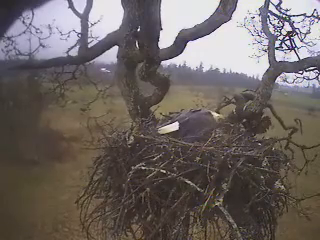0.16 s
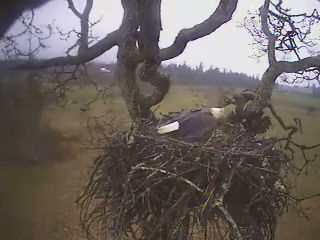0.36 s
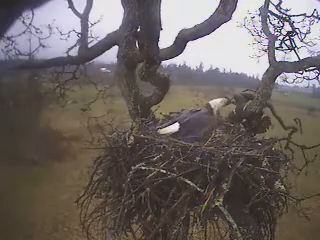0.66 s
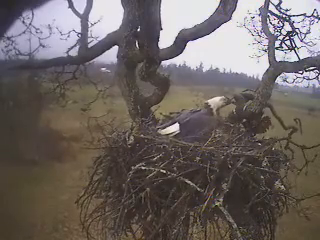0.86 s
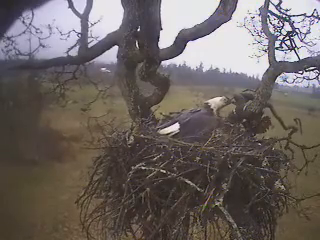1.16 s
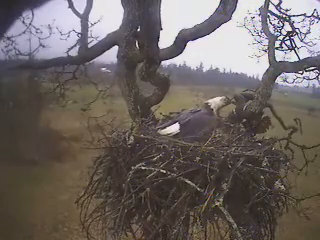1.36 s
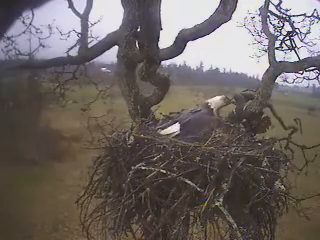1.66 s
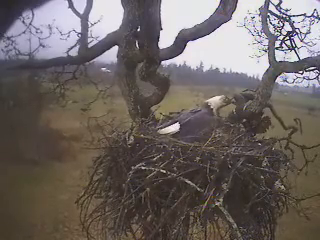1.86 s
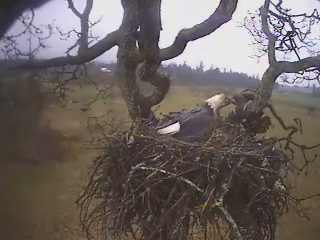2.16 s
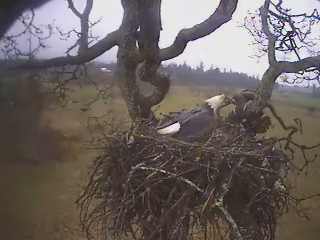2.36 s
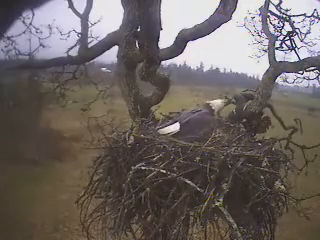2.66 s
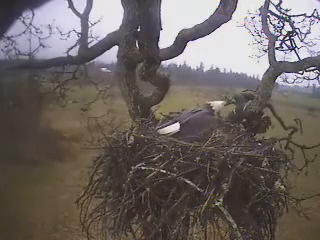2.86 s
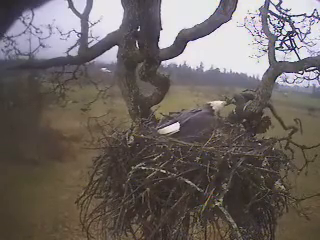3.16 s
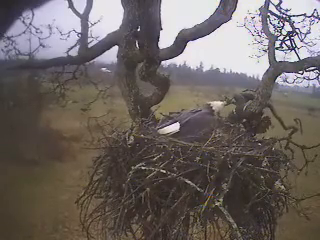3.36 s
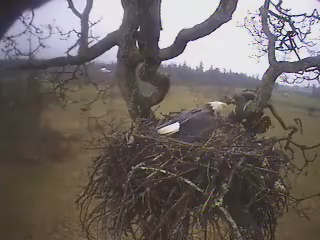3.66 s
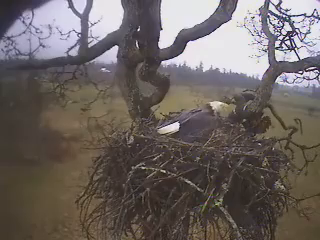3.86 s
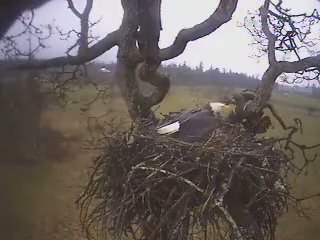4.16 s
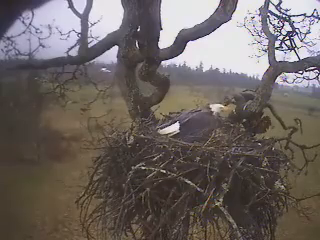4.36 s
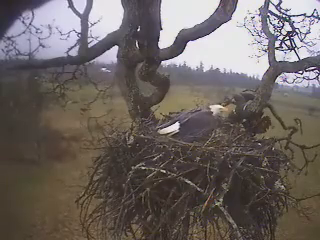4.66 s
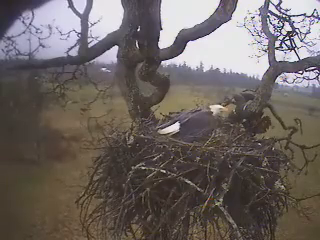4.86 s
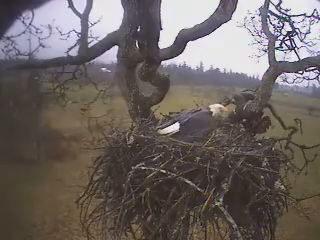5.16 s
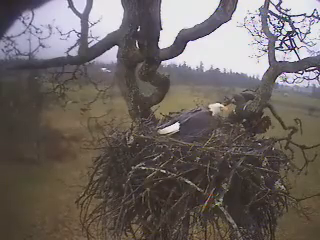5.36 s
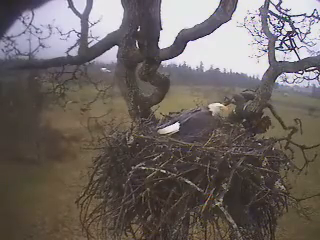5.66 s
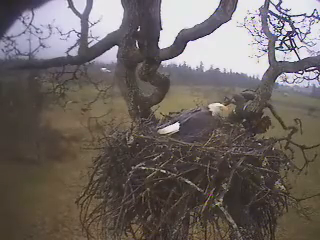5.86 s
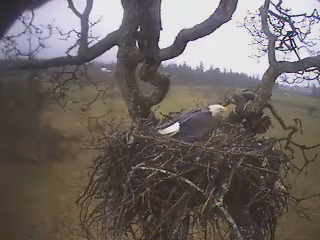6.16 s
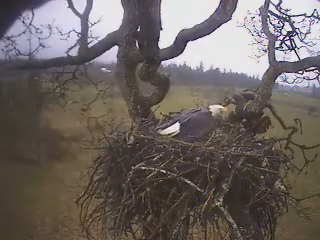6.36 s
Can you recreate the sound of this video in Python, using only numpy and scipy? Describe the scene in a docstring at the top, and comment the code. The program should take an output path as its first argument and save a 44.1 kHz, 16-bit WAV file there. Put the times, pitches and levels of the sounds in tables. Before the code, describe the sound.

A bald eagle squeals hoarsely, gives eight short rising yelps, then overloaded bursts of shrill chittering over low wind and steady hiss in a treetop nest.

```python
"""A hoarse squeal opens the scene at a treetop nest of two bald eagles, over low wind and steady hiss.
Eight short rising yelps and bursts of shrill chittering follow, with thin piping from farther away.
Each call is a near-pure tone with an octave and hoarse noise; sparse random taps give its faint echoes.
The calls overload a small nest microphone; twig ticks, rustles and puffs are brief shaped noise.
Nearly all of the sound is in the left channel."""
import sys
import numpy as np
from scipy import signal
from scipy.fft import rfft, irfft, next_fast_len
from scipy.io import wavfile
from scipy.ndimage import uniform_filter1d

SR = 44100
rng = np.random.default_rng(int(sys.argv[2]) if len(sys.argv) > 2 else 0)


def write(x):
    x = np.atleast_2d(x).T
    wavfile.write(sys.argv[1], SR, np.round(np.clip(x, -1, 1) * 32767).astype(np.int16))


N = 287077
T = np.arange(N) / SR  # [s]

# In all tables levels are relative; octave levels are relative to the fundamental.
# wind spectrum: (frequency [Hz], density [dB per Hz])
WIND = [(15, -57), (30, 5.5), (48, -2.5), (72, -0.5), (87, 1), (104, -5.5), (150, -9.5), (178, -7.5),
        (230, -14.5), (400, -19.5), (750, -22.5), (1100, -20.5), (1550, -29), (2000, -62)]
# hiss spectrum: (frequency [Hz], density [dB per Hz])
HISS = [(1200, -27), (1700, 7.5), (1930, -13), (2200, 11), (2420, 0), (2600, -7), (2870, 7), (3150, -2.5),
        (4300, 5.5), (5400, 6), (7150, -1), (7700, -20), (8400, -13), (9200, -57)]
# twig ticks: (start [s], snap level [dB], knock level [dB])
TICKS = [(0.7555, -31, -41), (0.8042, -32, -52), (2.5274, -50, -35.5), (3.02, -38, -38),
         (3.1002, -38.5, -44), (3.429, -37, -42), (3.5727, -31.5, -58), (3.8616, -38, -59),
         (4.013, -32.5, -34.5), (4.28, -34, -38), (5.6155, -38, -41.5), (5.676, -41, -59),
         (5.8429, -29, -39), (6.0018, -36.5, -60)]
# dry snap and rustle spectrum: (frequency [Hz], gain [dB])
SNAP_COLOUR = [(800, -13), (2200, -2), (4000, 4.5), (5500, 5), (7000, -2), (8500, -45), (10000, -34),
               (12000, -38)]
# dull knock spectrum: (frequency [Hz], gain [dB])
KNOCK_COLOUR = [(200, -20), (600, 5), (1100, 1), (1800, 0.5), (3500, -56)]
# short dry rustles in the nest: (centre [s], level [dB], half length [s])
RUSTLES = [(.638, -20.5, 0.0032), (.655, -32, 0.079), (1.502, -28, 0.012)]
# soft low puffs from the bird after its yelps: (centre [s], level [dB], half length [s])
PUFFS = [(0.696, -27, 0.03), (1.013, -25.5, 0.031), (1.263, -26.5, 0.027), (1.55, -27.5, 0.034),
         (1.833, -25.5, 0.017), (2.122, -35.5, 0.022), (2.378, -35.5, 0.02), (2.658, -29, 0.026)]
# puff spectrum: (frequency [Hz], gain [dB])
PUFF_COLOUR = [(150, -17), (400, 10.5), (560, -10), (760, 14.5), (1000, 4), (1400, 8), (1750, 9),
               (2300, -44), (6000, -69)]
# reverberation of the trees: (frequency [Hz], 60 dB decay time [s])
TREES = [(500, 0.96), (2500, 0.77), (5500, 0.84), (8000, 0.49), (12000, 0.74)]
# spectrum of the breathy hiss around the calls: (frequency [Hz], density [dB per Hz])
CALL_HISS = [(500, -10), (1500, -4), (1900, -4.5), (2250, 3), (2900, 7), (3800, -11), (4500, 5),
             (5600, 3.5), (6700, -10.5), (8400, -4), (9300, -26), (12000, -12.5)]
# thin distant notes:
# (start [s], length [s], first pitch [Hz], middle pitch [Hz], last pitch [Hz], level [dB], octave level [dB])
PIPES = [ (.885, 0.23, 3594, 3690, 3820, -18, -11), (1.562, 0.1, 4905, 5210, 5400, -28.5, -40),
         (1.655, 0.093, 4050, 3985, 3935, -16.5, -17.5), (2.287, .034, 3500, 3430, 3535, -14, -12),
         (4.303, 0.015, 3620, 3623, 3450, -15, 0), (4.97, 0.03, 1370, 1391, 1404, -24, -12),
         (6.233, 0.021, 4060, 3870, 3940, -14, -10), ]
# registers of the opening squeal:
# (start [s], length [s], first pitch [Hz], middle pitch [Hz], last pitch [Hz], effort [dB], octave level [dB])
SQUEAL = [(0, .082, 2262, 2277, 2400, -2.5, 10.5), (.079, 0.1, 3182, 3255, 3247, -8.5, -43),
          (.18, 0.034, 2350, 1945, 1880, -14.5, 2.5)]
# two-voiced part of the squeal: (time [s], signed relative strength)
SPLIT = [(.078, -1.5), (.086, 3.6), (.12, 2.1), (.16, 3.5), (.178, 3.5), (.184, -1)]
# tones added by the second voice: (multiple of the pitch, level [dB])
SPLIT_TONES = [(4 / 5, -14.5), (6 / 5, -17.5), (8 / 5, -17), (9 / 5, -8.5), (10 / 5, -20.5)]
# yelps that crack from a low into a high register: (start [s], length [s], crack after the start [s],
# top pitch [Hz], low-register effort [dB], high-register effort [dB], octave level [dB])
YELPS = [ (.511, 0.045, 0.032, 3186, -4.5, -6, -10), (.898, 0.062, 0.03, 3047, -6, -2, -10.5),
         (1.154, .079, .024, 2772, -9, -12, 1.5), (1.441, 0.056, 0.028, 2850, -4.5, -9, -0.5),
         (1.72, 0.056, 0.025, 2788, -8, -8.5, -1.5), (2.014, 0.072, 0.027, 2876, -6, -7, -3),
         (2.277, 0.069, 0.019, 2824, -10.5, -7.5, -9), (2.545, 0.068, 0.026, 2937, -8, -5, -4), ]
# upward sweep that opens every yelp: (from [Hz], to [Hz], rise time [s])
LOW_REGISTER = (1500, 2510, .018)
# throat resonances in a yelp: (frequency [Hz], gain [dB])
THROAT = [(1300, -18), (1620, 1), (1900, -23.5), (2230, 3.5), (2520, 2), (2820, 2), (3500, -19),
          (4150, 2.5), (4550, -9.5), (4920, 9), (5230, 5), (5580, 1), (6500, -4), (8400, 5.5)]
# shrill arched notes, slurred into a wavering scream where they touch:
# (start [s], length [s], first pitch [Hz], crest pitch [Hz], last pitch [Hz], effort [dB], octave level [dB])
CHITTER = [ (4.302, 0.022, 2850, 2880, 2832, -11, -20), (4.355, .094, 2836, 3012, 2795, 11, -3.5),
           (4.448, 0.087, 2795, 3009, 2812, 13, -1), (4.557, .076, 2815, 2927, 2820, 12.5, -7),
           (4.659, .016, 4287, 4850, 4465, -9, -26), (4.678, 0.015, 2952, 2872, 2793, 11.5, -5),
           (4.692, 0.034, 2816, 2935, 2787, 15.5, -9), (4.731, .014, 2278, 2212, 2139, -12.5, -8),
           (4.785, 0.0098, 3950, 3810, 3390, -19, -2), (4.794, .012, 2925, 2835, 2810, 13, -3),
           (4.805, 0.032, 2306, 2414, 2305, 1, 13.5), (4.832, .021, 2270, 2230, 2034, 7.5, 0),
           (4.876, .064, 1969, 2302, 2103, 2.5, 5.5), (6.241, 0.0486, 2898, 2870, 2810, 7, -58),
           (6.285, 0.085, 2903, 2958, 2750, 13.5, -9.5), (6.376, 0.11, 2710, 2930, 2860, 11.5, -21.5),
           (6.481, 0.051, 2866, 2864, 2875, 25, -5.5), ]
# register flips: (pitch [Hz], width [Hz], fundamental loss [dB], octave gain [dB])
YELP_FLIP = (2392, 122, 7.8, 9.7)
CHITTER_FLIP = (2735, 52, 7.1, 30.4)
# windpipe: (one resonance [Hz], spacing to its neighbours [Hz])
WINDPIPE = (2230, 600)
# sputter of the overloaded input: (frequency [Hz], density [dB per Hz])
SPUTTER = [(30, -13), (120, -3.5), (420, 8), (900, -7.5), (2300, -0.5), (4000, -41), (12000, -24)]
# microphone response to the calls: (frequency [Hz], gain [dB])
MICROPHONE = [(2000, -1.5), (6000, -3.5), (8800, -2.5), (9800, -7), (11500, -15.5), (12500, -6.5)]
# leak of the calls into the right channel: (frequency [Hz], gain [dB])
LEAK = [(2500, -24.5), (4500, -23.5), (8500, -26), (12000, -40)]

YELP_ATTACK_S, YELP_RELEASE_S, YELP_EDGE_DB = 0.021, 0.012, -19.5
CRACK_S, CRACK_DB = 0.0028, -11  # the voice falters briefly as it cracks
HIGH_ARCH_HZ, HIGH_CREST = 199.4, 0.58  # climb after the crack; crest as a share of the time left
RASP_FADE_S = 0.0041  # decay time of the power of the rasp after a pitch break
EDGE_HZ = 12550  # upper band limit


def amp(db):
    """Logarithmic level: decibels become an amplitude ratio."""
    return 10 ** (np.asarray(db) / 20)


def unit(x):
    """Normalisation: scales to an rms of 1."""
    return x / np.sqrt(np.mean(x ** 2) + 1e-20)


def read(points, hz):
    """Linear interpolation of a table on a log-frequency axis."""
    f, value = np.transpose(points)
    return np.interp(np.log(hz + 1), np.log(f + 1), value)


def shape(x, colour):
    """Linear filtering: multiplies the spectrum by a gain table."""
    size = next_fast_len(N + 4096)
    gain = amp(read(colour, np.fft.rfftfreq(size, 1 / SR)))
    return irfft(rfft(x, size) * gain, size)[:N]


def noise(colour):
    """Spectral shaping: white noise takes the given colour at an rms of 1."""
    return unit(shape(rng.standard_normal(N), colour))


def wander(hz):
    """Low-passed random process: changes smoothly, up to about hz times a second."""
    size = next_fast_len(N)
    low_pass = 1 / (1 + (np.fft.rfftfreq(size, 1 / SR) / hz) ** 4)
    return unit(irfft(rfft(rng.standard_normal(size)) * low_pass, size)[:N])


def swells(rows):
    """Gaussian envelopes: one short hump of level for each row."""
    return sum(amp(db) * np.exp(-((T - s) / half) ** 2) for s, db, half in rows)


def air(wind_db=-36, hiss_db=-46.5):
    """Stationary broadband noise: low wind under an almost even hiss."""
    gust, flicker = amp(0.5 * wander(6)), amp(0.4 * wander(20))
    return amp(wind_db) * gust * noise(WIND) + amp(hiss_db) * flicker * noise(HISS)


def twigs(snap_db=1, knock_db=5, t60=0.043, rise_s=0.000067):
    """Impulsive excitation with exponential decay: a dry snap with a duller knock under it."""
    snap, knock, out = noise(SNAP_COLOUR), noise(KNOCK_COLOUR), np.zeros(N)
    for start, tick_db, low_db in TICKS:
        at = np.flatnonzero((T >= start) & (T < start + 0.1))
        age = T[at] - start
        envelope = np.tanh(age / rise_s) * amp(-60 * age / t60)
        tick = amp(tick_db + snap_db) * snap[at] + amp(low_db + knock_db) * knock[at]
        out[at] += envelope * tick
    return out


def puffs_and_rustles(ragged_db=2.0):
    """Amplitude-modulated noise: ragged, hollow puffs from the bird and dry rustles in the nest."""
    puffs = noise(PUFF_COLOUR) * swells(PUFFS)
    rustles = noise(SNAP_COLOUR) * swells(RUSTLES)
    return (puffs + rustles) * amp(ragged_db * wander(100))


def surroundings(x, nest_db, nest_t60, trees_db, echo_db, echo_s, echo_width):
    """Multipath convolution: scatter from nest and limbs, a tail from the trees, a soft ground echo."""
    t = T[:SR]
    # three sets of sparse random reflections, about 3000 a second
    taps = rng.choice([-1., 1.], (3, SR)) * (rng.random((3, SR)) < 3000 / SR)
    nest = taps[0] * amp(-60 * t / nest_t60) * (t > 0.003)
    hz, when, spectrum = signal.stft(taps[1] * (t > 0.012), SR, nperseg=256)
    decay = amp(-60 * when / read(TREES, hz)[:, None])
    trees = signal.istft(spectrum * decay, SR, nperseg=256)[1][:SR]
    echo = taps[2] * np.exp(-((t - echo_s) / echo_width) ** 2)
    paths = [(nest_db, nest), (trees_db, trees), (echo_db, echo)]
    response = sum(amp(db) * unit(h) for db, h in paths) / np.sqrt(SR)
    return signal.fftconvolve(x, response)[:N]


def call_hiss(voice, db, spread_s):
    """Envelope following: noise tracks a smoothed level, so a soft, breathy hiss surrounds each call."""
    window = signal.windows.hann(2 * round(spread_s * SR) + 1)
    power = signal.fftconvolve(np.minimum(voice ** 2, 1), window / window.sum(), "same")
    return amp(db) * np.sqrt(abs(power)) * noise(CALL_HISS)


def arches(notes, swell_db, brighten_db, edge_s, ease):
    """Pitch contours: arched pitch, gain and octave level, offset towards the middle of each note."""
    start, length, first, crest, last, db, octave_db = np.transpose(notes)[:, :, None]
    side = np.linspace(-1, 1, 41)[1:-1]  # from start to end, 0 in the middle
    bend = ease * np.sin(np.pi / 2 * side) ** 2 + (1 - ease) * side ** 2
    when = np.maximum.accumulate((start + length * (side + 1) / 2).ravel())
    pitch = crest + bend * (np.where(side < 0, first, last) - crest)
    controls = pitch, db - swell_db * bend, octave_db - brighten_db * bend
    hz, effort_db, octave_db = (np.interp(T, when, c.ravel()) for c in controls)
    sounding = ((T >= start) & (T < start + length)).any(axis=0)
    gate = uniform_filter1d(1. * sounding, size=round(edge_s * SR))
    return hz, amp(effort_db) * gate ** 3, octave_db


def sweeps(seesaw_db=4.5):
    """Register change: a fast sweep, a crack, then an arch where fundamental and octave trade strength."""
    from_hz, to_hz, rise_s = LOW_REGISTER
    hz, gain, octave_db, shake = np.full(N, 1. * from_hz), np.zeros(N), np.zeros(N), wander(85)
    for start, length, crack_s, top_hz, low_db, high_db, overtone_db in YELPS:
        at = np.flatnonzero((T >= start) & (T < start + length))
        age = T[at] - start
        high = age > crack_s
        crack = np.exp(-((age - crack_s) / CRACK_S) ** 2)
        sweep = to_hz + (from_hz - to_hz) * np.exp(-(age / rise_s) ** 2)
        progress = (age - crack_s) / (length - crack_s)
        arch = top_hz - HIGH_ARCH_HZ * (progress / HIGH_CREST - 1) ** 2
        hz[at] = np.where(high, arch, sweep)
        held = np.minimum(1, np.minimum(age / YELP_ATTACK_S, (length - age) / YELP_RELEASE_S))
        trade_db = seesaw_db * high * shake[at]
        effort_db = np.where(high, high_db, low_db) + YELP_EDGE_DB * (1 - held)
        effort_db += CRACK_DB * crack - trade_db
        gain[at] = amp(effort_db) * signal.windows.tukey(len(at), 0.06)
        octave_db[at] = overtone_db + 1.8 * trade_db
    return hz, gain, octave_db


def flipped(voice, flip):
    """Mode switching: near one awkward pitch the fundamental gives way and the octave takes over."""
    hz, gain, octave_db = voice
    centre_hz, width_hz, loss_db, gain_db = flip
    near = np.exp(-((hz - centre_hz) / width_hz) ** 2)
    return hz, gain * amp(-loss_db * near), octave_db + (loss_db + gain_db) * near


def whistles(voice, jitter, shimmer, third_db, hoarse_db, rasp_db, cling=0):
    """Syrinx oscillation: a near-pure tone with a hoarse octave, which rasps where the pitch breaks."""
    at = np.flatnonzero(voice[1] > 1e-4)  # only the sounding samples
    hz, gain, octave_db = (uniform_filter1d(c, size=110) for c in voice)
    out, drift, flutter = np.zeros(N), wander(316)[at], wander(133)[at]
    turbulence = (wander(180) + 1j * wander(365))[at]
    rasp = noise([(200, 10.5), (1500, -9), (4500, 2.5), (7000, 1), (12000, -47)])[at]
    split = np.interp(T[at], *np.transpose(SPLIT), left=0, right=0)
    octave = amp(octave_db[at])
    # the pitch clings to the evenly spaced windpipe resonances, so a glide climbs in steps
    anchor, spacing = WINDPIPE
    hz = hz - cling * spacing / (2 * np.pi) * np.sin(2 * np.pi * (hz - anchor) / spacing)
    phase = 2 * np.pi * np.cumsum(hz[at] * (1 + jitter * drift)) / SR
    tone = np.cos(phase) + octave * (np.cos(2 * phase) - amp(third_db) * np.cos(3 * phase))
    # turbulent air makes each cycle unevenly lopsided, which blurs the octave
    tone += amp(hoarse_db) * (1 + 2 * octave) * (turbulence * np.exp(2j * phase)).real
    # the two sides of the syrinx lock at 4:5 and give sum and difference tones
    tone += split * sum(amp(db) * np.cos(multiple * phase) for multiple, db in SPLIT_TONES)
    # fast pitch change sets off the rasp, which then dies away
    breaking = np.tanh((np.gradient(np.log(hz)) * SR / 30) ** 2)
    keep = np.exp(-1 / (RASP_FADE_S * SR))
    breaking = np.sqrt(signal.lfilter([1 - keep], [1, -keep], breaking ** 2 + 1e-12))[at]
    out[at] = gain[at] * (tone * np.exp(shimmer * flutter) + amp(rasp_db) * breaking * rasp)
    return out


def far_piping():
    """Tonal radiation: thin distant notes with almost no third partial or hoarseness."""
    notes = arches(PIPES, swell_db=11.5, brighten_db=-0.5, edge_s=0.0096, ease=0.82)
    return whistles(notes, jitter=0.02, shimmer=0.22, third_db=-45, hoarse_db=-45, rasp_db=-20)


def opening_squeal():
    """Biphonation: a squeal in three registers that splits into two locked voices."""
    notes = arches(SQUEAL, swell_db=3, brighten_db=9.0, edge_s=0.0049, ease=0.46)
    return whistles(notes, jitter=0.006, shimmer=0.13, third_db=-17, hoarse_db=-22, rasp_db=-12)


def rising_yelps():
    """Source and resonator coupling: shaky yelps whose pitch clings to the windpipe resonances."""
    notes = flipped(sweeps(), YELP_FLIP)
    return whistles(notes, jitter=0.019, shimmer=0.36, third_db=-24, hoarse_db=-21, rasp_db=-13, cling=0.7)


def chittering():
    """Frequency modulation: steadier, shrill arched notes that slur where they touch."""
    notes = arches(CHITTER, swell_db=7, brighten_db=12, edge_s=0.015, ease=0.6)
    notes = flipped(notes, CHITTER_FLIP)
    return whistles(notes, jitter=0.0026, shimmer=0.1, third_db=-17, hoarse_db=-20.5, rasp_db=-10)


def eagles():
    """Superposition of direct calls, echoes and breathy hiss: chittering is the driest of the calls."""
    squeal, yelps, chitter = opening_squeal(), rising_yelps(), chittering()
    hoarse = shape(yelps, THROAT) + call_hiss(yelps, db=-15, spread_s=0.09) + far_piping()
    hoarse += surroundings(hoarse, nest_db=-4.5, nest_t60=0.093, trees_db=-18.5,
                           echo_db=-25.0, echo_s=0.1435, echo_width=0.016)
    clear = squeal + chitter
    echoes = surroundings(clear, nest_db=-21, nest_t60=0.15, trees_db=-29,
                          echo_db=-33, echo_s=0.135, echo_width=0.015)
    # the squeal echoes more widely
    echoes += surroundings(squeal, nest_db=-13.0, nest_t60=0.3, trees_db=-23.5,
                           echo_db=-33, echo_s=0.122, echo_width=0.025)
    hisses = call_hiss(squeal, db=-22, spread_s=0.07) + call_hiss(chitter, db=-30, spread_s=0.06)
    return hoarse + clear + echoes + hisses


def overload(x, ceiling=0.79, bias=0.0033, knee=6, sputter_db=-36):
    """Nonlinear saturation: the input flattens peaks a little lopsidedly and sputters when overdriven."""
    drive = signal.resample_poly(x, 4, 1) / ceiling + bias  # oversampled against aliasing
    flat = drive / (1 + abs(drive) ** knee) ** (1 / knee) - bias
    flat = ceiling * signal.resample_poly(flat, 1, 4)
    strain = uniform_filter1d(1. * (abs(x) > ceiling), size=300)
    return flat + amp(sputter_db + 2 * wander(25)) * strain * noise(SPUTTER)


def scene(air_right_db=-22, own_air_db=-21):
    """Channel crosstalk: the right holds a faint leak of the left and a little noise of its own."""
    birds = shape(overload(eagles()), MICROPHONE)
    background = air() + twigs() + puffs_and_rustles()
    right = shape(birds, LEAK) + amp(air_right_db) * background + amp(own_air_db) * air()
    return np.array([birds + background, right])


def record(dry):
    """Band limiting and constant bias: a steep low-pass, and both inputs rest above zero."""
    offset = np.array([[0.1], [0.032]])  # left, right
    low_pass = signal.firwin(301, EDGE_HZ, window=("kaiser", 9), fs=SR)
    return signal.oaconvolve(dry, low_pass[None], "same") + offset


dry = scene()
out = record(dry)
write(out)
```